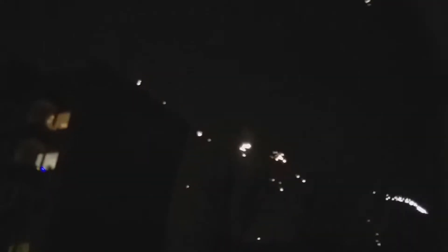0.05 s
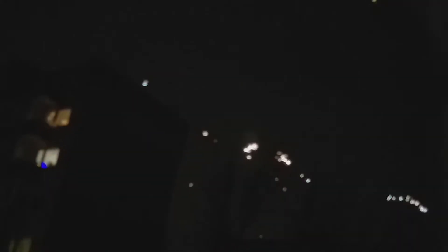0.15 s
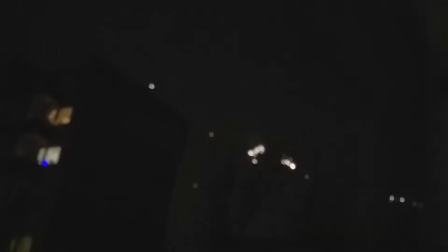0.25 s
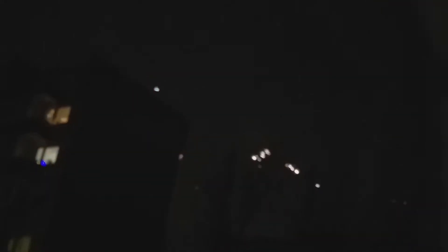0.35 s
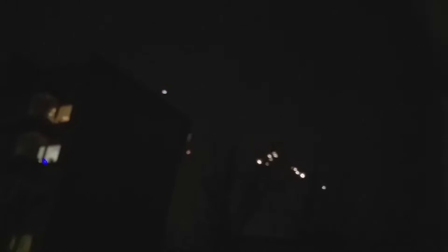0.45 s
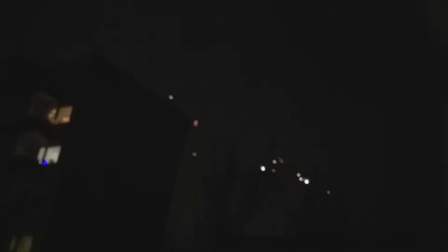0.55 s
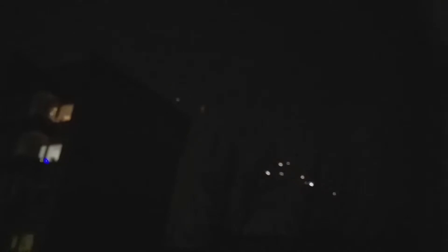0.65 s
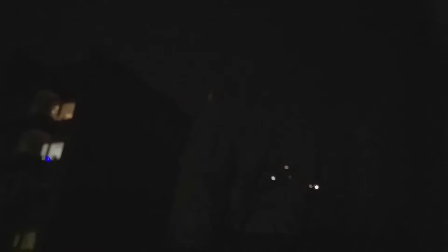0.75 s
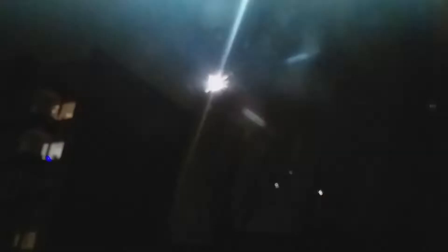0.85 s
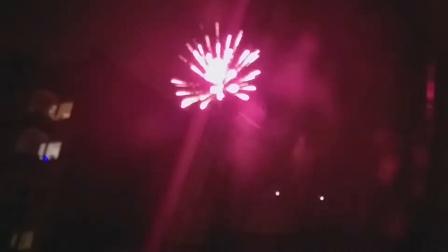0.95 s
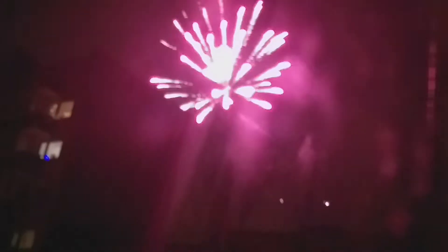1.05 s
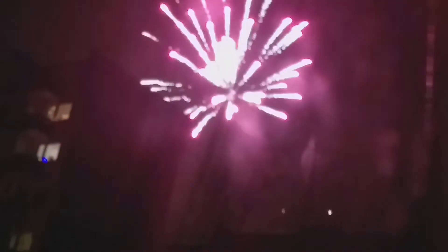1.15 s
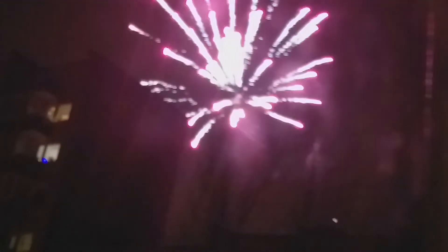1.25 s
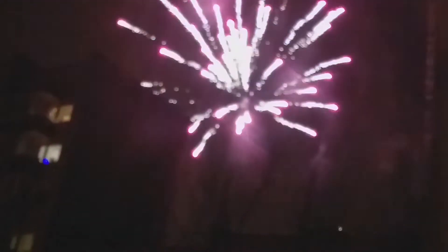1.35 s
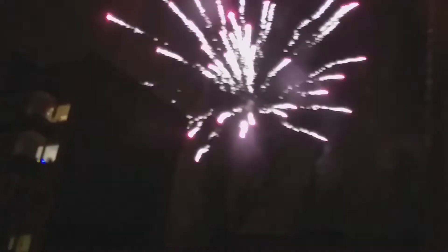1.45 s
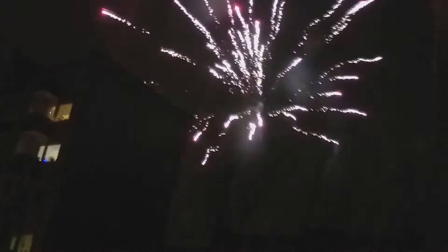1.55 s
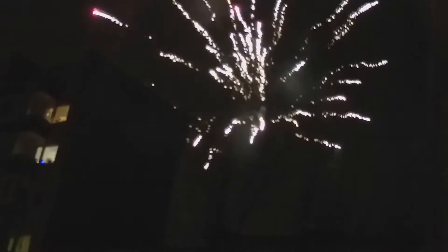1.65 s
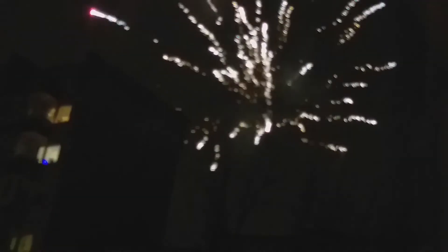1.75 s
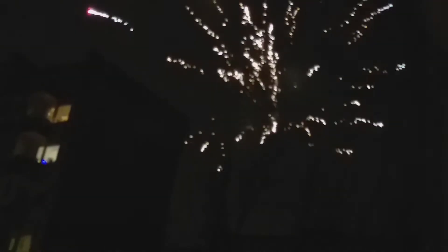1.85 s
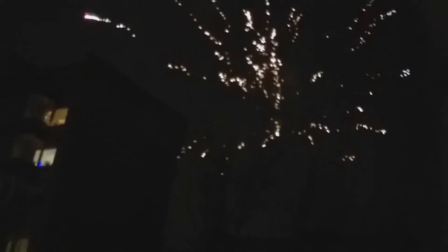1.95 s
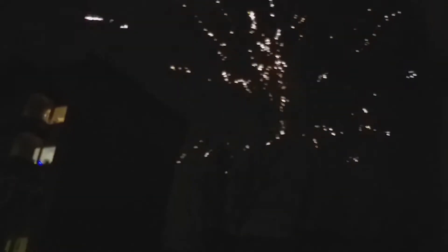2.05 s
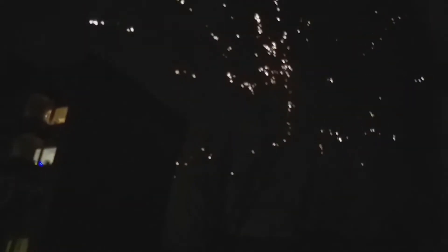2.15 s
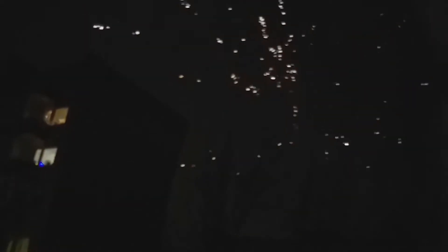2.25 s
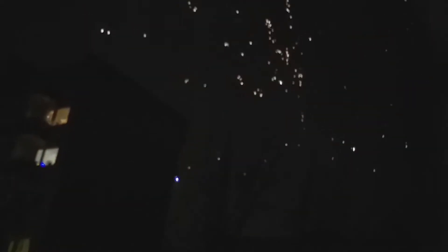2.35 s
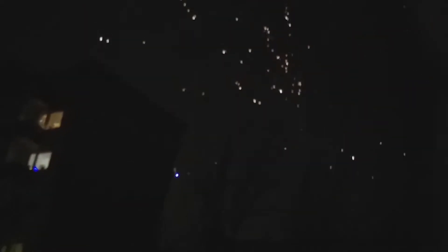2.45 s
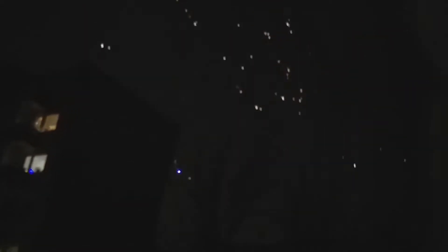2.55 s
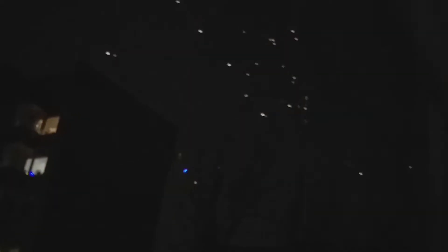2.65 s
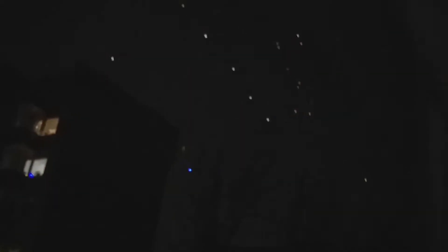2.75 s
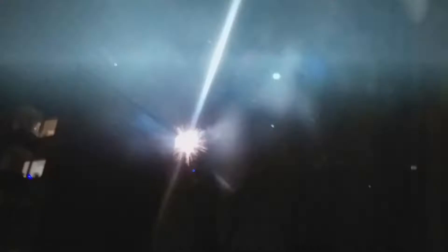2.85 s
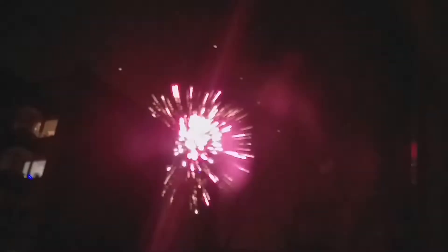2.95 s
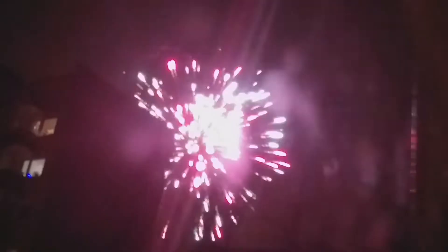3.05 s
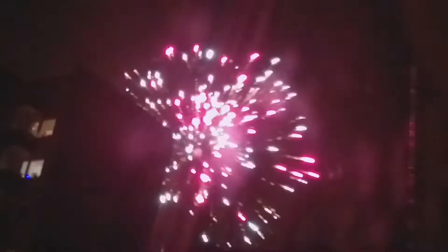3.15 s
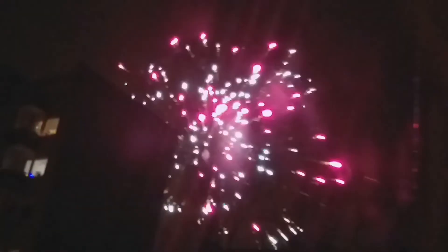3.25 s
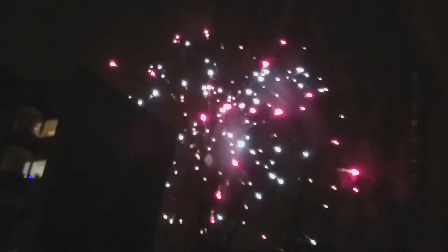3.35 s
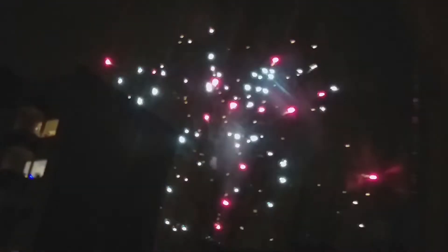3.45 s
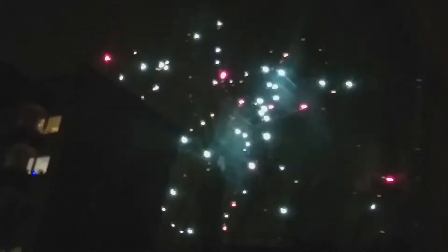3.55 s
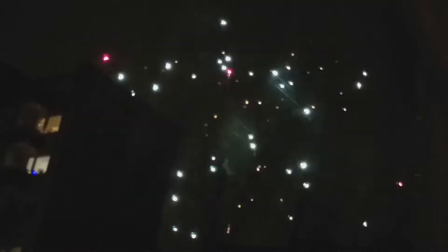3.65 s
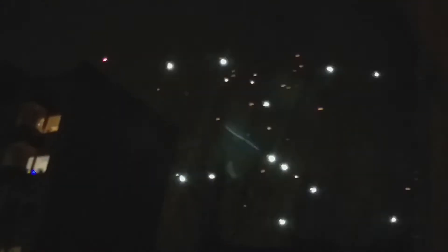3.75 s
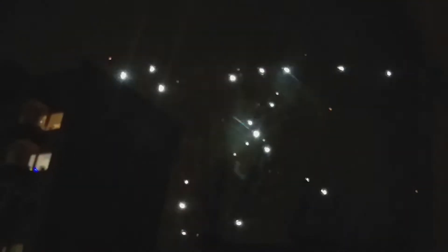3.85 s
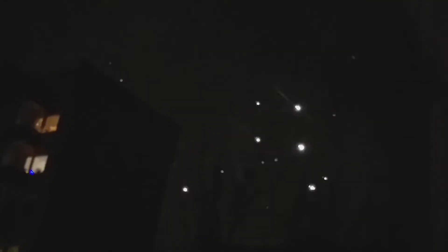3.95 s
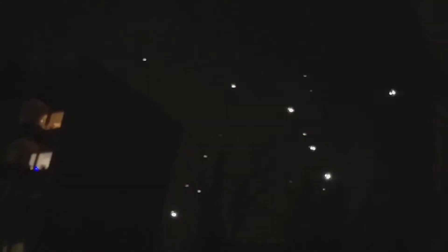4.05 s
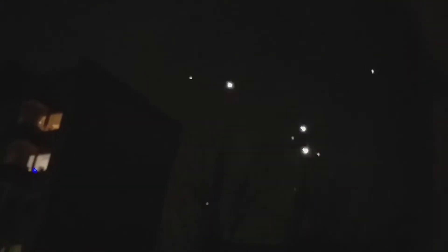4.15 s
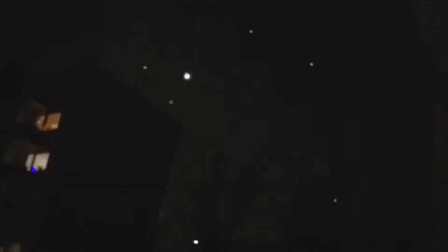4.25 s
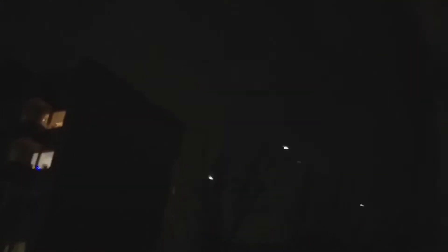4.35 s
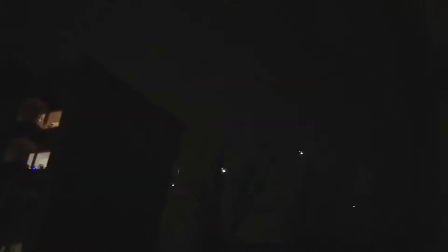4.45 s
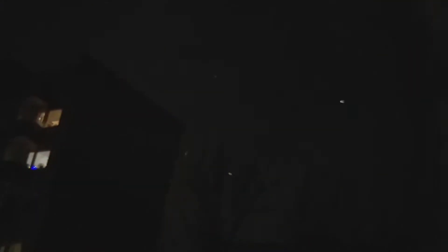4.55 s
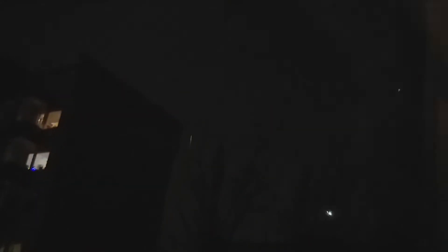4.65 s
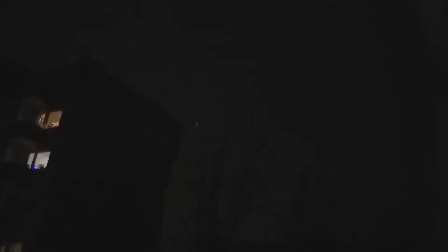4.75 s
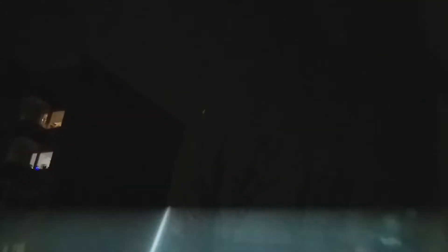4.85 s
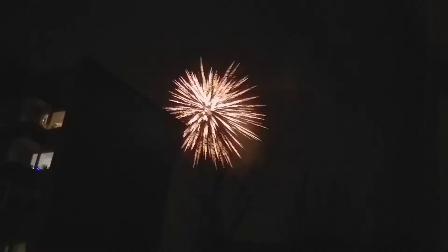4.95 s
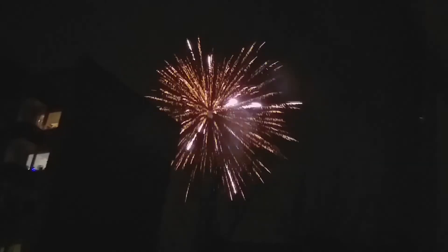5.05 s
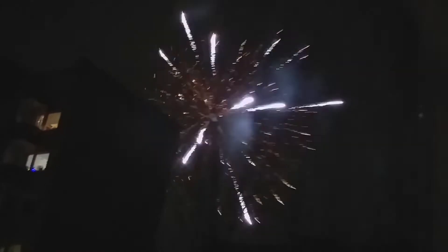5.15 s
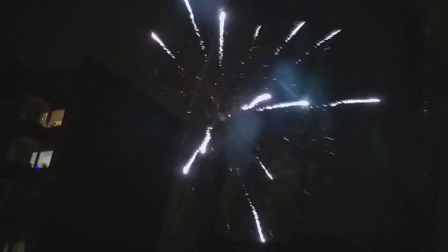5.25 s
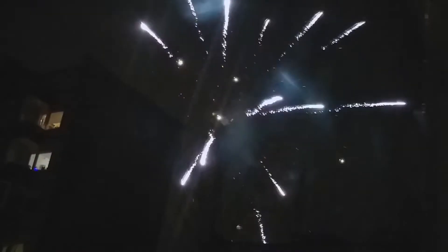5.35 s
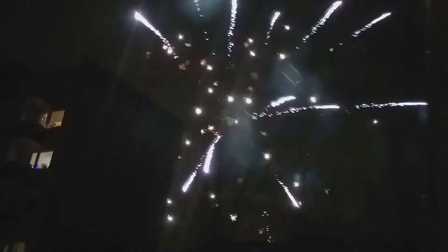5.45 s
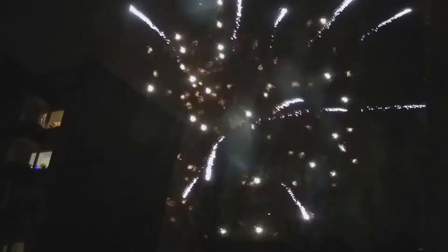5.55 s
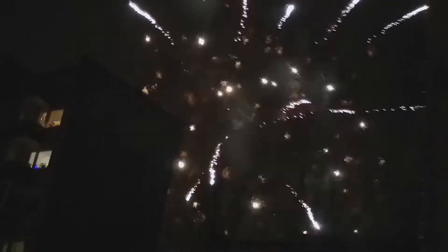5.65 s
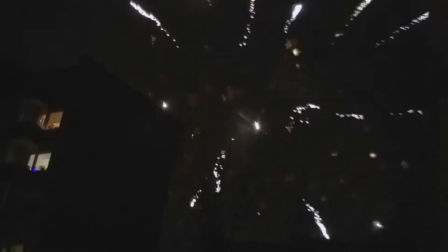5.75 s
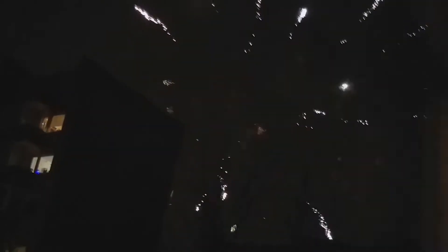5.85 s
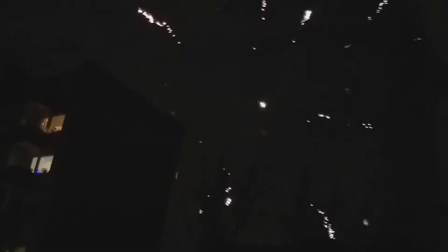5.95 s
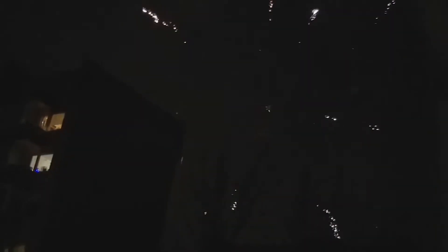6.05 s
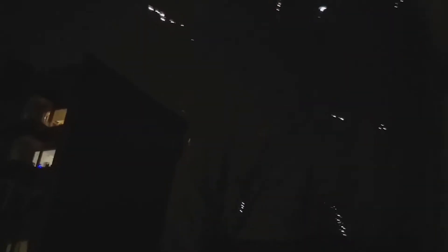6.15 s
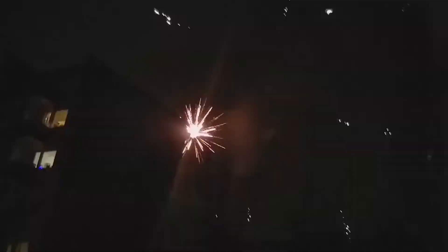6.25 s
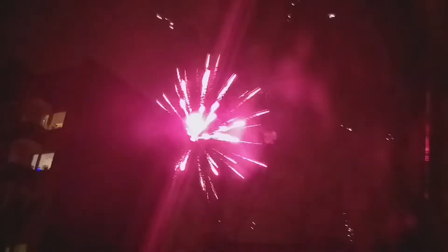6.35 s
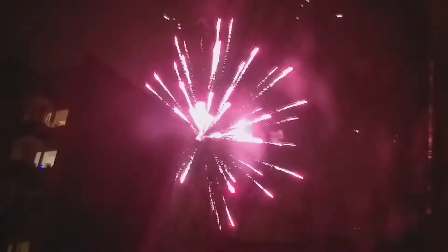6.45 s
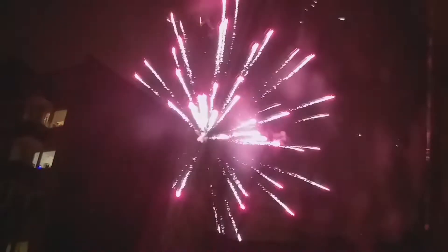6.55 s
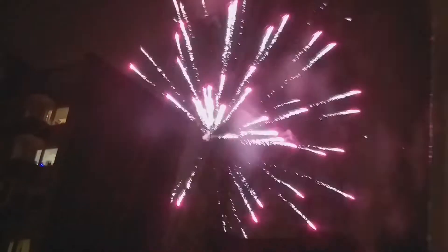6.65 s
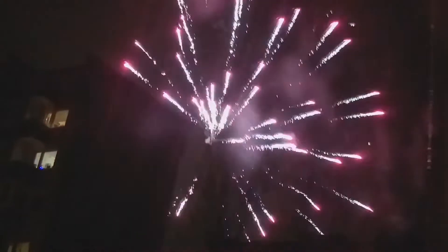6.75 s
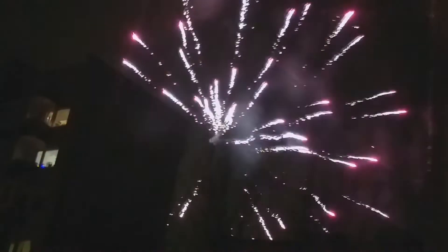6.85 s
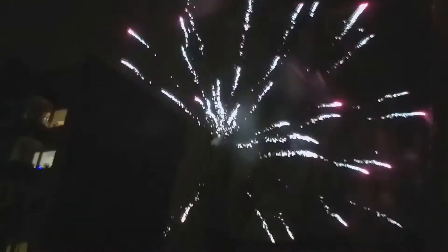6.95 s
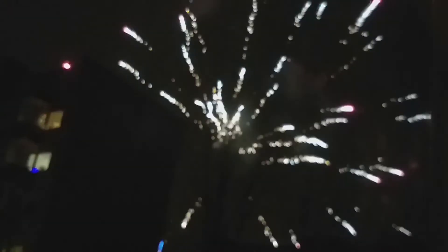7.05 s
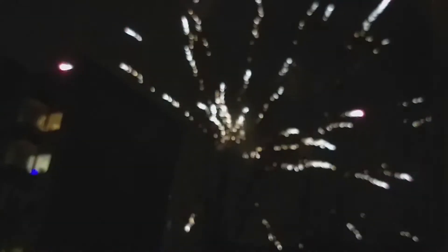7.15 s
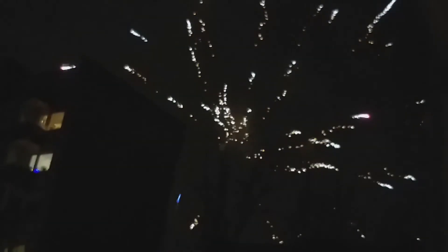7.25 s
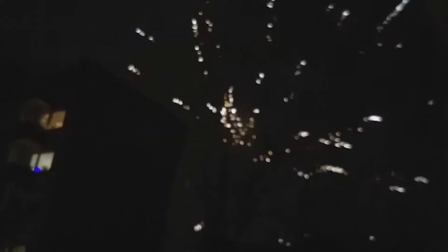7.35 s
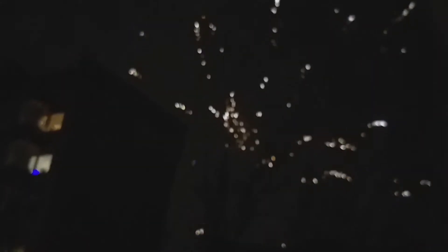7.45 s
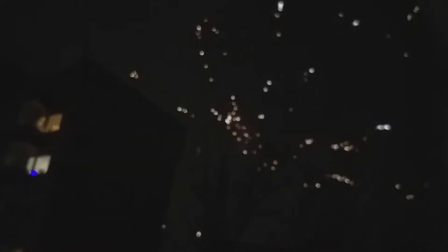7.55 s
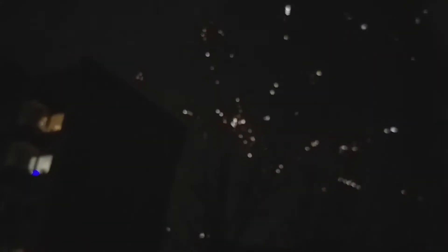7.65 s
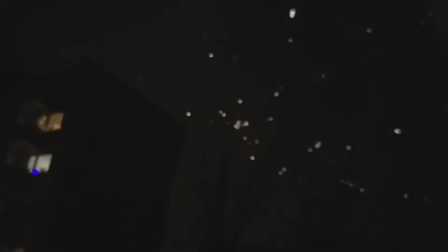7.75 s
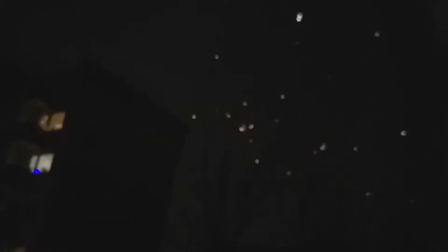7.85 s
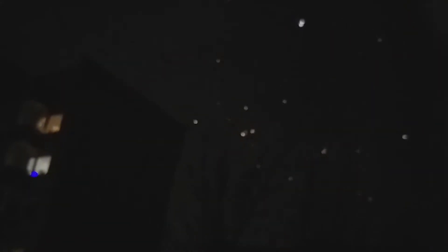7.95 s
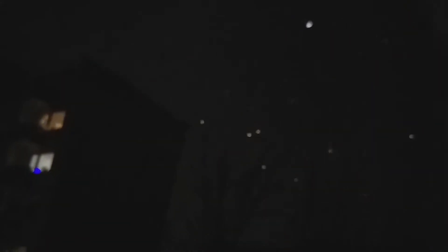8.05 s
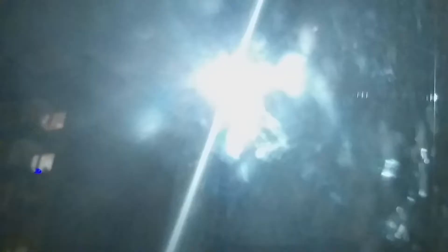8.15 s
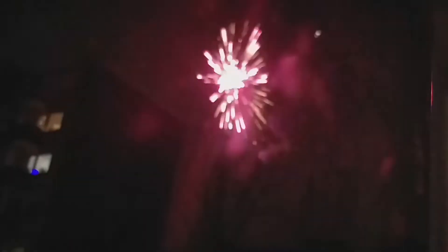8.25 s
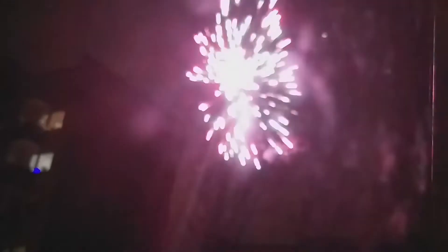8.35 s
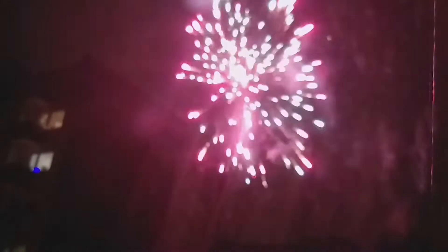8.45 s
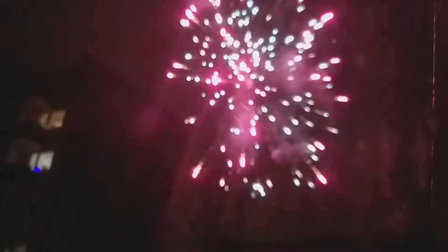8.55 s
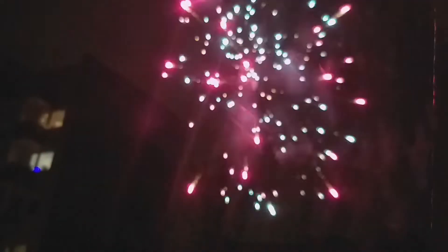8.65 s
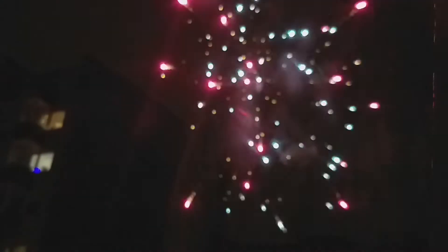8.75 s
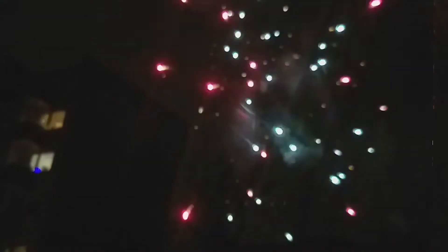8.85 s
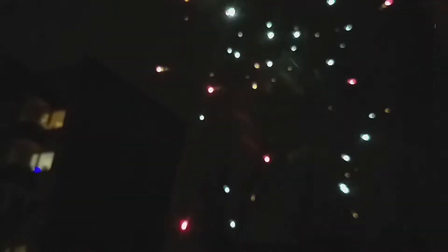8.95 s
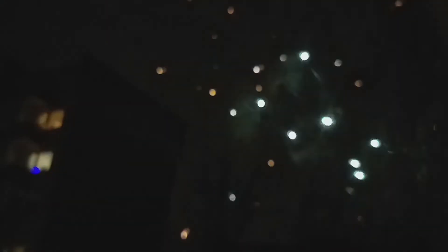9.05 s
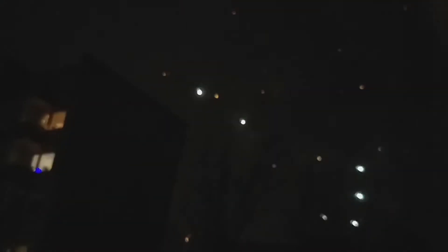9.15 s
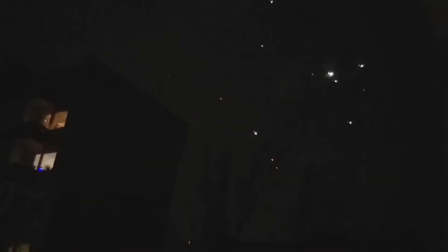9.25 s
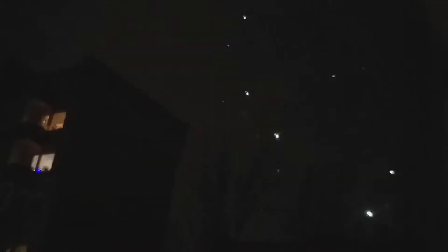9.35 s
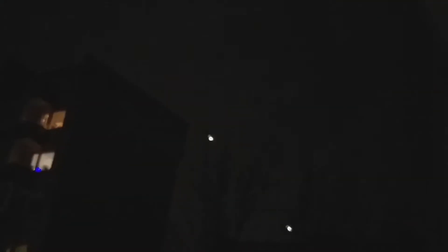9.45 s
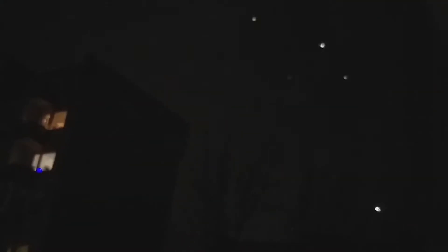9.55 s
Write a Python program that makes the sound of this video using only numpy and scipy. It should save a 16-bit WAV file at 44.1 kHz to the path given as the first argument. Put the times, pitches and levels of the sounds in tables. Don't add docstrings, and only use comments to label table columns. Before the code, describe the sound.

Inside a small room with the window shut, a fading rumble and weak stray pops open the scene. A dull mortar thump at 0.6 s leads to a hard overhead burst at 1.1 s with long clattering echoes and a flash of crackle. A softer launch follows at 1.65 s, then a drier, sharply cracking burst at 3.1 s. The strongest launch thuds at 4.1 s; a loud, bright bang hits at 5.1 s, with fine crackle swelling near 5.6 s. A heavy, duller burst at 6.4 s crackles briefly, another launch thumps at 7.3 s, and the loudest bang lands at 8.4 s with the strongest crackle. A last launch sounds at 8.9 s, leaving the roll to decay. Every blast is boxy around the low mids, with a thin upper leak, ragged building echoes and a long dulling roll. Faint hiss dips after the loudest bangs.

```python
import sys
import numpy as np
from scipy import signal
from scipy.fft import rfft, irfft, next_fast_len
from scipy.io import wavfile
from scipy.ndimage import uniform_filter1d

SR = 44100
rng = np.random.default_rng(int(sys.argv[2]) if len(sys.argv) > 2 else 0)


def pcm_store(signal):
    levels = np.round(np.clip(np.atleast_2d(signal), -1, 1) * 32767)
    wavfile.write(sys.argv[1], SR, levels.astype(np.int16).T)


def invert_db(x):
    u = np.asarray(x, float) / 20
    return 10 ** u


N = 422919

# start in seconds, peak in dB, treble in dB against the peak,
# t60 of the near echoes in seconds, top end in dB.
BURSTS = [
    (1.07, -6, -20.5, 0.52, 13),
    (3.066, -7, -18, 0.36, 16),
    (5.109, -3.5, -15, 0.38, 15.5),
    (6.436, -3.5, -23.5, 0.36, 11.5),
    (8.387, -2.5, -19, 0.42, 15.5),
]
# stretch of the near delays (factor), near fronts in dB,
# far blocks in dB, crack in dB.
PLACES = [
    (.87, -14.5, -8, -9),
    (.968, 1.5, 0.5, 6.5),
    (1.077, -4.5, -5.5, -1),
    (0.67, -1.5, 0.5, -2.5),
    (0.91, -10, -10.5, -1),
]
# start in seconds, peak in dB, treble in dB against the peak, crack in dB
# against the peak, extra treble of the echoes in dB.
LAUNCHES = [
    (0.637, -10.5, -18, -53.5, 3.5),
    (1.649, -13.5, -9.5, -45, -3),
    (4.055, -8, -13, -44.5, -1.5),
    (7.3, -9, -16.5, -60, 1.5),
    (8.904, -9.5, -11, -46.5, -6),
]
# delay in seconds, level in dB.
BURST_MIRRORS = [(0, 0.5), (.0038, -13), (.0073, 3.5), (0.0146, 1.5), (0.0174, -1), (0.0242, -6.5),
                 (0.031, -11), (.038, -15)]
# delay in seconds, level in dB.
LAUNCH_MIRRORS = [(0, 3), (.008, -9), (0.034, -9), (.047, -12.5), (.066, -11), (.093, -11)]
# delay in seconds, level in dB, treble in dB,
# t60 in seconds, top end in dB.
NEAR_FRONTS = [(.07, -14, -20.5, 0.81, 13.5), (0.162, -10, -19.5, 0.29, 8.5), (.23, -13.5, -14, .5, 2.5)]
# delay in seconds, level in dB, treble in dB, t60 in seconds, top end in dB.
FAR_FRONTS = [(0.349, -8.5, -19, 0.47, -1), (0.414, -15.5, -17, 0.34, 3), (.49, -17, -18, .7, -1),
              (0.921, -21, -18.5, 0.89, -9)]
# delay in seconds, level in dB, t60 in seconds, extra treble in dB.
LAUNCH_RETURNS = [(0.014, -14.5, 0.38, -3.5), (0.06, -11.5, 0.18, -0.5), (.084, -13.5, 0.31, 4),
                  (0.246, -11, 0.14, 1.5), (0.284, -15, .3, -0.5), (.34, -25, 0.26, 5.5),
                  (0.436, -28, 0.34, -3.5)]
# start in seconds, peak in dB, treble in dB against the peak,
# t60 in seconds, top end in dB.
STRAYS = [(0.006, -33, -8.5, 0.43, 10), (0.125, -29.5, -13, 0.56, -3), (.2, -36.5, -12.5, .6, -12),
          (.3, -42, -8.5, 0.43, -14), (1.449, -19, -28, 0.27, -7), (2.122, -40, -42, 0.62, -3),
          (4.391, -19.5, -22, 0.26, -2), (3.445, -23, -15, 0.35, 4.5), (5.597, -20.5, -12.5, 0.94, -7),
          (5.787, -23, -9, 0.92, 9), (6.85, -30, -10.5, 0.26, 6), (7.724, -14.5, -28, 0.17, -13),
          (9.348, -27.5, -16, 0.18, -10)]
# start in seconds, crackle in dB, rise in seconds, hold in seconds,
# fall in dB per second.
GLITTER = [
    (1.088, -52.5, 0.003, 0.088, 220),
    (5.496, -59, 0.25, 0.19, 260),
    (6.098, -74, .015, 0.017, 202),
    (6.455, -61, 0.0032, .065, 114.5),
    (8.415, -49.5, .004, .05, 141),
]
# start in seconds, level in dB, treble in dB,
# hold in seconds, fall in dB per second.
ROLLS = [(-.5, -33.5, 10.5, 0.49, 10.5), (0.628, -29, 3.5, 0.16, 18), (1.074, -31.5, 13.5, 0.95, 16),
         (1.668, -36.5, -12, 0.32, 22.5), (3.081, -29, 13, 0.54, 17.5), (4.019, -31.5, 4.5, 0.21, 13),
         (5.13, -28.5, 15.5, 0.41, 12), (6.422, -28.5, 12.5, 0.58, 16.5), (7.282, -30.5, 8, 0.21, 13),
         (8.388, -32, 11, 0.34, 15.5), (8.88, -34, 12, 0.22, 14.5), (9.259, -48, 22, 0.45, 3)]
# frequency in Hz, gain in dB.
PANE = [(30, -55.5), (150, -7), (220, 0), (300, -1), (480, -9), (640, -22), (1000, -30.5), (1400, -43.5),
        (2370, -50.5), (2760, -36), (3350, -44.5), (3750, -49.5), (16000, -40)]
# frequency in Hz, level in dB, t60 in seconds.
ROOM = [(163.34, -3, 0.33), (236.2, -5, 0.19), (317.8, 1.5, 0.045), (384.8, -4.5, 0.074),
        (445.3, -11, 0.092), (512.8, -10.5, 0.21), (613.4, -7.5, 0.2), (1030, -13.5, 0.5),
        (2780, -27, .045), (2990, -15.5, 0.016)]
# frequency in Hz, gain in dB.
MICROPHONE = [(3700, 10), (4250, 2.5), (4700, -10.5), (5300, -22), (6800, -38.5), (8000, -32.5),
              (11000, -61.5), (15000, -91)]
# frequency in Hz, level in dB.
HISS = [(20, 15), (100, 2.5), (1500, 2), (3800, -2.5), (6200, -4), (9900, -7), (15100, -4.5), (15700, -2.5),
        (15760, -57.5)]

SIZE, HOP = 128, 32
HZ = np.fft.rfftfreq(SIZE, 1 / SR)[:, None]
T = np.arange(N // HOP + 8) * HOP / SR
TREBLE = HZ > 900
LEVEL_LEAK = invert_db(3.0 * np.exp(-((HZ - 2950) / 260) ** 2) - 1.8 * np.clip((HZ - 3300) / 400, 0, 1)) ** 2


def add(mix, s, sound):
    part = mix[round(s * SR):][:len(sound)]
    part += sound[:len(part)]


def add_blast(mix, s, db, mirrors, flex_hz):
    t = np.arange(600) / SR
    flex = np.exp(-t / 0.0018) * np.sin(2 * np.pi * flex_hz * t)
    for delay, weaker_db in mirrors:
        add(mix, s + delay, invert_db(db + weaker_db) * flex)


def blasts(mix):
    for s, db, *_ in BURSTS:
        add_blast(mix, s - .0015, db - 8.5, BURST_MIRRORS, flex_hz=442.0)
    for s, db, *_ in LAUNCHES:
        add_blast(mix, s + 0.0011, db - 17, LAUNCH_MIRRORS, flex_hz=330.0)


def tilt(hz, treble_db, top_db):
    shelf = np.clip(np.log2((hz + 1) / 480) / 1.89, 0, 1)
    top = np.clip((hz - 3100) / 1200, 0, 1.6)
    return treble_db * shelf + top_db * top


def clump(s, db, treble_db, t60, top_db, rise_s, leak_db=0.):
    age = T - s
    live = (age > 0) & (age < 1)
    age = age[live]
    fall_db = age * (60 / t60 + tilt(HZ, treble_db=24.0, top_db=36.0))
    gap_db = leak_db * np.exp(-((HZ - 1800) / 600) ** 2 - age / 0.055)
    level_db = db + tilt(HZ, treble_db + 25.5, top_db) + gap_db - fall_db
    power = np.zeros((len(HZ), len(T)))
    power[:, live] = (np.minimum(age / rise_s, 1) * invert_db(level_db)) ** 2
    return power


def burst_echoes():
    power = 0
    crisp = invert_db(np.where(HZ < 200, -14., 0))
    crack_band = np.exp(-((HZ - 4250) / 600) ** 2)
    for (s, db, treble_db, t60, top_db), (*_, crack_db) in zip(BURSTS, PLACES):
        near = clump(s, db - 3.5, treble_db, t60, top_db, rise_s=0.0042, leak_db=13.5)
        front = clump(s - .0015, db + 4.5, treble_db, 0.022, top_db, rise_s=0.011, leak_db=4.5)
        walls = clump(s + 0.0018, db + 12.5, treble_db, 0.036, top_db, rise_s=0.007, leak_db=5.0)
        crack = clump(s, db + crack_db + 1.5, -19.0, 0.047, top_db=19.0, rise_s=.005)
        power = power + crisp * near + TREBLE * (front + walls) + crack_band * crack
    return power


def launch_echoes():
    power = 0
    snap_db = 11.0 * np.clip((HZ - 4400) / 1200, 0, 1) - 16.0 * np.clip((HZ - 6600) / 900, 0, 1)
    snap = TREBLE * invert_db(snap_db) ** 2
    for s, db, treble_db, crack_db, echoes_db in LAUNCHES:
        front = clump(s + 0.00069, db + crack_db + 38.0, -19.0, 0.031, top_db=11.0, rise_s=.0015, leak_db=5.0)
        walls = clump(s + 0.0035, db + 4.5, treble_db - 7, 0.079, top_db=-4.5, rise_s=0.01)
        power = power + snap * front + TREBLE * walls
        for delay, weaker_db, t60, extra_db in LAUNCH_RETURNS:
            late_treble_db = treble_db + extra_db + echoes_db
            power += LEVEL_LEAK * clump(s + delay, db + 0.5 + weaker_db, late_treble_db, t60,
                                        top_db=-12.0, rise_s=0.014, leak_db=-11.5)
    return power


def house_front_returns():
    returns = list(STRAYS)
    for (s, db, *_), (stretch, near_db, far_db, _) in zip(BURSTS, PLACES):
        for delay, weaker_db, *rest in NEAR_FRONTS:
            returns.append((s + stretch * delay, db + near_db + weaker_db, *rest))
        for delay, weaker_db, *rest in FAR_FRONTS:
            returns.append((s + delay, db + far_db + weaker_db, *rest))
    power = 0
    for s, db, treble_db, t60, top_db in returns:
        slap = clump(s, db - 9, treble_db, .045, top_db=11.5, rise_s=0.0028, leak_db=4.0)
        ragged = clump(s - .004, db - 6, treble_db + 3.5, t60, top_db, rise_s=0.0067, leak_db=-0.5)
        power = power + TREBLE * slap + LEVEL_LEAK * ragged
    return power


def roll(s, db, treble_db, hold_s, fall_db_per_s):
    age = np.maximum(T - s, 0)
    level_db = db - fall_db_per_s * np.maximum(age - hold_s, 0)
    colour_db = tilt(HZ, treble_db - 12 * age, top_db=-12)
    colour_db -= 4 * np.exp(-((HZ - 1850) / 550) ** 2)
    colour_db += 3.5 * np.exp(-((HZ - 2950) / 300) ** 2)
    swell = np.minimum(age / 0.17, 1) ** 2
    return (swell * invert_db(level_db + colour_db)) ** 2


def town():
    murmur = invert_db(-47 + tilt(HZ, treble_db=-10, top_db=-12)) ** 2
    return murmur + sum(roll(*row) for row in ROLLS)


def echoes():
    power = burst_echoes() + launch_echoes() + house_front_returns() + town()
    a, b = rng.standard_normal((len(T), len(HZ), 2)).T
    white = (a + 1j * b) * np.sqrt(2 / SIZE)
    low, high = uniform_filter1d(rng.standard_normal((len(T), 2)), 14, 0).T
    lumps_db = np.where(TREBLE, 1.4 * evened(high), 1.44 * evened(low))
    spectra = white * np.sqrt(power) * invert_db(lumps_db)
    return signal.istft(spectra, nperseg=SIZE, noverlap=SIZE - HOP)[1][:N]


def glitter():
    t = np.arange(N) / SR
    pops = invert_db(5.5 * np.minimum(rng.exponential(1, N), 4)) * (rng.random(N) < 1200 / SR)
    decay = np.exp(-np.arange(900) / SR / .003)
    puffs = np.sqrt(abs(signal.oaconvolve(pops, decay)[:N])) * rng.standard_normal(N)
    thin = causal(tilt(np.linspace(0, SR / 2, 513), treble_db=27.5, top_db=12.5))
    level = np.zeros(N)
    for s, db, rise, hold, fall_db in GLITTER:
        lost_db = fall_db * np.maximum(t - s - rise - hold, 0)
        level += np.clip((t - s) / rise, 0, 1) ** 2 * invert_db(db + 53.5 - lost_db)
    return level * evened(signal.oaconvolve(puffs, thin)[:N])


def indoors(x):
    hz = np.linspace(0, SR / 2, 8193)
    pane = causal(read(PANE, hz) + read(MICROPHONE, hz))
    t = np.arange(SR // 2) / SR
    ring = sum(invert_db(db - 60 * t / t60) * np.sin(2 * np.pi * mode_hz * t) for mode_hz, db, t60 in ROOM)
    heard = invert_db(-46.5) * signal.fftconvolve(ring, pane)
    add(heard, 0, pane)
    return signal.oaconvolve(x, heard / np.linalg.norm(heard))[:N]


def hiss():
    white = rfft(rng.standard_normal(next_fast_len(N)))
    colour = invert_db(read(HISS, np.linspace(0, SR / 2, len(white))))
    return invert_db(-74) * evened(irfft(white * colour)[:N])


def evened(x):
    return x / np.sqrt(np.mean(x ** 2) + 1e-20)


def read(points, hz):
    f, value = np.transpose(points)
    return np.interp(np.log(hz + 1), np.log(f + 1), value)


def causal(db):
    half = len(db) // 2
    log_gain = np.log(invert_db(np.r_[db, db[-2:0:-1]]))
    phase = -signal.hilbert(log_gain).imag
    response = np.fft.ifft(np.exp(log_gain + 1j * phase)).real[:half]
    return response * np.hanning(half * 2)[half:] ** .5


def scene():
    outside = echoes() + glitter()
    blasts(outside)
    return indoors(outside)[None]


def roll_off(x):
    return signal.sosfilt(signal.butter(12, 16800, fs=SR, output="sos"), x)


def record(dry):
    power_db = 10 * np.log10(abs(uniform_filter1d(dry[0] ** 2, 800)) + 1e-12)
    fall = np.arange(N) * 3.6 / SR
    held_db = np.maximum.accumulate(power_db + fall) - fall
    over_db = np.maximum(held_db + 11, 0)
    overloaded = 1.45 * np.tanh(dry / 1.593)
    return roll_off(overloaded + hiss() / invert_db(0.24 * over_db))


dry = scene()
out = record(dry)
pcm_store(out)
```